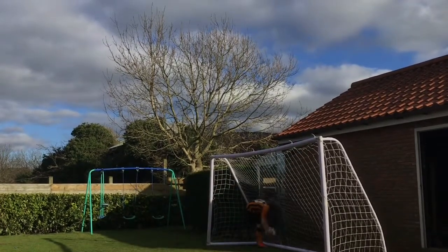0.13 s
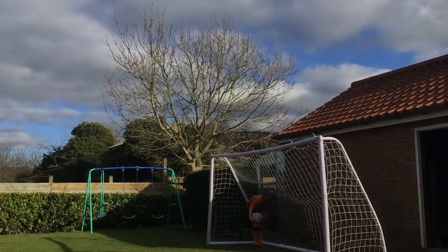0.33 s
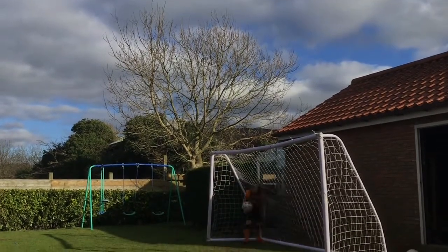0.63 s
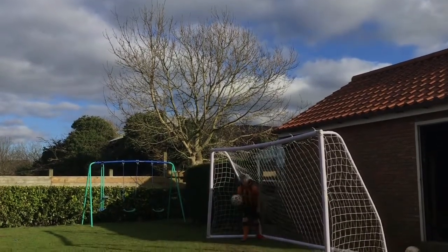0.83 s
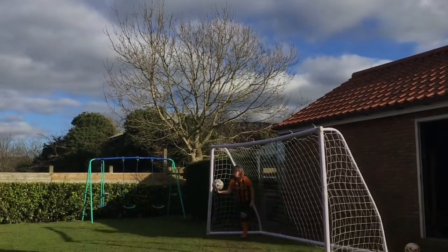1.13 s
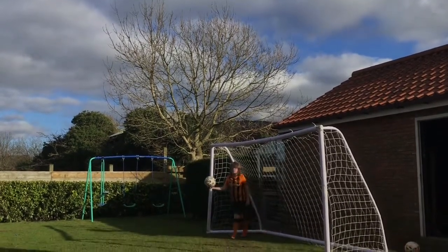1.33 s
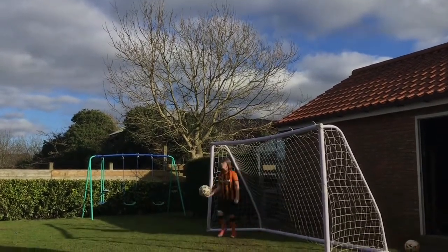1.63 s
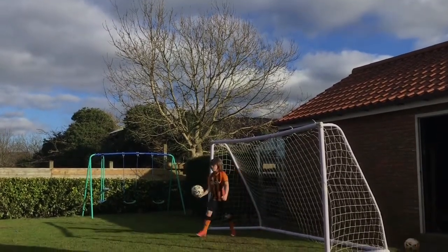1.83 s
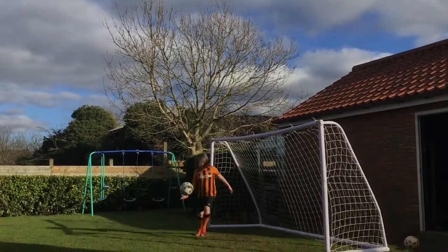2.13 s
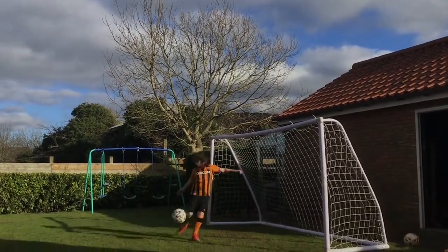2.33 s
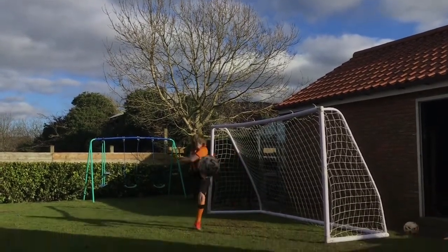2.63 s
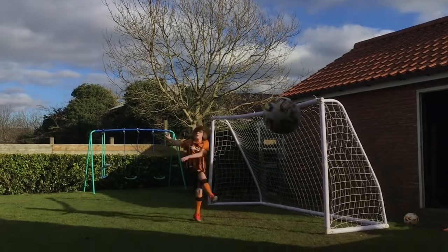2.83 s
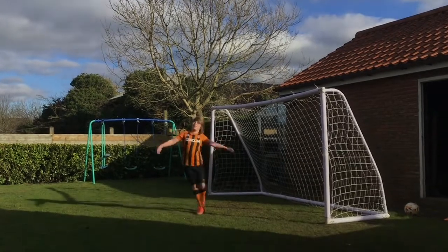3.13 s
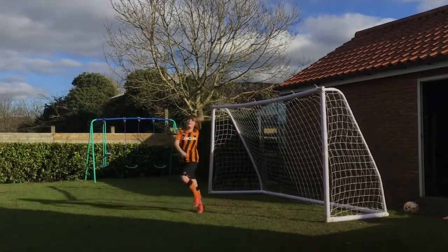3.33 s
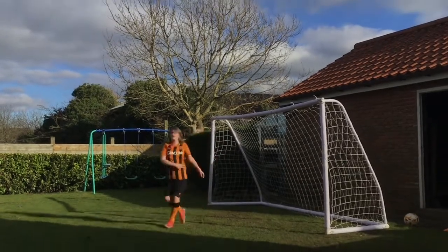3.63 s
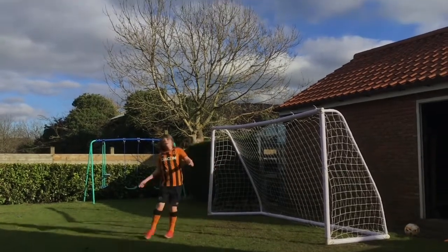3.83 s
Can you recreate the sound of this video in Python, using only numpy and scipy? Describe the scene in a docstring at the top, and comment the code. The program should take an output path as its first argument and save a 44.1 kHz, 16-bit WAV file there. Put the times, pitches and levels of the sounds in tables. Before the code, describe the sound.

In a quiet garden, a football is softly handled, then kicked with a thump. It bangs hard against wood close to the microphone, then lands and bounces more softly, over a faint rumble and barely audible birds.

```python
"""Hands and clothes scuff on a football, then a volley thuds and flutters between garden walls.
The ball slams into wooden boards close by, drops on the grass and bounces again.
The squashed ball gives the thud, its casing the slap, the air inside a hollow ping.
Boots scuff, small birds whistle far off and distant traffic rumbles."""
import sys
import numpy as np
from scipy import signal
from scipy.fft import rfft, irfft
from scipy.io import wavfile
from scipy.ndimage import uniform_filter1d

SR = 44100
rng = np.random.default_rng(int(sys.argv[2]) if len(sys.argv) > 2 else 0)


def put_to_file(sound):
    """Save the sound as 16-bit audio at rate SR, in the file named by the first command-line argument."""
    columns = np.atleast_2d(sound).T  # one column per channel
    safe = np.clip(columns, -1, 1)
    whole_steps = np.round(safe * 32767)
    wavfile.write(sys.argv[1], SR, whole_steps.astype(np.int16))


N = 176400
T = np.arange(N) / SR
BIN_HZ = np.arange(N // 2 + 1) * SR / N

# ball thuds: start_s, level_db, pitch_hz, rise_s, hold_s, t60_s, boom_db, flutter_send_db
BALL_THUDS = [(2.399, -16.5, 123, 0.0046, 0.0071, 0.15, -33, -10),
              (3.1403, -3.5, 128.8, .005, 0.0064, 0.05, -22.5, -32),
              (3.295, -34.5, 89, 0.005, 0.033, 0.23, -59, -34),
              (3.3595, -9, 99.7, 0.0086, 0.005, 0.039, -24.5, -39),
              (3.383, -12, 80, 0.0051, .014, .13, -27, -27.5),
              (3.447, -28.5, 118, 0.0054, 0.02, 0.091, -40, -12.5),
              (3.886, -32, 115.6, 0.0069, 0.037, 0.75, -48, -18)]
# woody knocks within the blows: start_s, level_db, pitch_hz, t60_s
WOOD_KNOCKS = [(3.1415, -10, 244.4, .1), (3.283, -36, 345, .16), (3.3565, -15.5, 264.6, 0.066)]
BAND_HZ = (100, 300, 900, 3000, 12000)
# casing slaps, surface crunch: start_s, rise_s, t60_s, band_db at each BAND_HZ, tail_gain_db
CASING_SLAPS = [(2.3985, 0.00055, 0.13, -36.5, -35.5, -36, -45, -49, -18),
                (2.422, 0.0018, 0.049, -50.5, -35, -54, -52, -50.5, -26.5),
                (3.1403, 0.00093, 0.09, -21.5, -16.5, -23.5, -32.5, -43.5, -34),
                (3.1467, 0.00087, .055, -34, -30, -46, -21.5, -38.5, -34),
                (3.153, 0.0009, 0.021, -27, -21, -41.5, -30.5, -44, -28),
                (3.283, 0.0088, 0.067, -42.5, -41, -62, -67, -71, -24.5),
                (3.3525, 0.0023, 0.088, -51, -25, -43.5, -49.5, -48.5, -25),
                (3.358, 0.0076, 0.11, -27.5, -25.5, -41.5, -41, -43.5, -23.5),
                (3.4425, 0.0097, 0.11, -38, -48.5, -48, -48.5, -51, -23),
                (3.885, 0.0025, 0.23, -42.5, -43, -52.5, -56, -57.5, -12),
                (3.9068, 0.00093, 0.11, -48, -38.5, -46, -44, -45, -17.5),
                (3.9355, .001, .11, -46, -37, -47.5, -46.5, -54, -13)]
# slap colour: freq_hz, gain_db
SLAP_EQ = [(50, -1.5), (150, 5), (300, -1), (540, 0.5), (750, 3), (1150, -3), (1700, -2), (2700, 1.5),
           (3900, -5), (5600, -0.5), (7300, -3.5), (9000, -0.5), (11000, -6.5), (15000, -1)]
# sharp first contacts: start_s, level_db
CASING_CRACKS = [(2.399, -23.5), (2.415, -25), (3.1397, -17.5), (3.1536, -19.5), (3.907, -23.5),
                 (3.9363, -27)]
# air modes inside the ball: pitch_hz, gain_db, width_hz
CAVITY_MODES = [(1056, -1, 26), (1214, 2, 15), (1307, 3.5, 16), (1622, 0, 25), (1839, 1, 35),
                (2091, -0.5, 25), (2368, 3, 45), (2706, 4, 43), (3284, 5, 66), (4457, 2.5, 90),
                (5730, 1, 80)]
# blows that ring those modes clearly: start_s, level_db
CAVITY_PINGS = [(2.40, -61), (3.147, -35.5), (3.359, -45.5), (3.448, -52), (3.908, -50.5), (3.937, -49.5)]
# modes of boards and ball: pitch_hz, gain_db, t60_s
BOARD_MODES = [(244, 9, 0.15), (286.7, -2.5, .45), (344, -11, 0.99), (461, -2, 0.25), (519, -9, 0.13),
               (605, -10, .24), (734, -2, 0.18), (853, -7, 0.15), (1242, -3.5, 0.19), (1614, -15.5, 0.32),
               (2050, -15.5, .16), (2312, -0.5, 0.12), (2525, -7.5, .15), (2640, -1.5, 0.1)]
# hands, clothes, steps: start_s, rise_s, t60_s, band_db at each BAND_HZ, tail_gain_db
PLAYER_SCUFFS = [(0.0, 0.034, 0.4, -78, -55.5, -85, -88, -63, -15),
                 (.63, .04, 0.5, -74, -86, -73.5, -88, -87, -12),
                 (.782, 0.046, 0.23, -86, -64, -57.5, -75, -60.5, -8),
                 (1.199, 0.024, 0.38, -82, -56, -61.5, -79.5, -60, -13),
                 (1.40, 0.0077, 0.26, -82, -69, -76.5, -77.5, -81, -20),
                 (1.67, .06, 0.35, -85, -62, -70.5, -78.5, -82, -15),
                 (2.265, 0.023, 0.22, -68, -76, -77.5, -81, -75.5, -13),
                 (2.961, .016, 0.37, -77, -63.5, -67.5, -67.5, -71.5, -11),
                 (3.06, 0.091, 0.37, -65, -64, -68.5, -73, -81, 6.5),
                 (3.735, 0.037, 0.52, -76, -82, -64.5, -78, -104, -11)]
# scuff colour: freq_hz, gain_db
SCUFF_EQ = [(100, -2), (250, -4.5), (450, 1.5), (620, 2), (950, -4.5), (1500, 1.5), (2500, 0), (4500, 2),
            (7200, -6.5), (8800, 1), (10500, -4), (15000, 1.5)]
# returns from fence and house: delay_s, gain_db
WALL_ECHOES = [(.052, -26), (.064, -24.5), (.086, -24.5)]
# distant birds: start_s, length_s, start_hz, end_hz, level_db
BIRD_CALLS = [(1.07, 0.11, 3360, 3350, -77.5), (2.27, 0.13, 7940, 7300, -79),
              (2.51, 0.0535, 7600, 7050, -79), (2.66, 0.071, 7300, 6500, -83)]
# traffic and hiss spectrum: freq_hz, gain_db
TRAFFIC_EQ = [(20, -44), (40, -21.5), (62, -13.5), (85, -4.5), (115, 1.5), (150, -3.5), (200, -15.5),
              (270, -14.5), (380, -21.5), (550, -31.5), (950, -39), (1800, -42.5), (3600, -43.5),
              (7000, -51), (9000, -49), (15500, -53)]


def from_db(db):
    """Decibels to gain."""
    return 10 ** (np.asarray(db) / 20)


def eq_db(points, hz):
    """Interpolate a spectrum over log frequency."""
    knots_hz, db = np.transpose(points)
    return np.interp(np.log(hz), np.log(knots_hz), db)


def unit_rms(x):
    """Scale to unit rms."""
    return x / np.sqrt(np.mean(x ** 2) + 1e-20)


def butter(x, order, cut_hz, kind="low"):
    """Causal Butterworth filter."""
    return signal.sosfilt(signal.butter(order, cut_hz, kind, fs=SR, output="sos"), x)


def envelope(age_s, rise_s, t60_s, hold_s=0):
    """Linear attack, hold, exponential release."""
    attack = np.clip(age_s / rise_s, 0, 1)
    return attack * from_db(-60 * np.clip((age_s - rise_s - hold_s) / t60_s, 0, 3))


def noise_bands():
    """Third-octave centres and their levelled noises, about unit power per octave."""
    edges_hz = 50 * 2 ** (np.arange(26) / 3)
    white = rfft(rng.standard_normal(N))
    noises = []
    for low_hz, high_hz in zip(edges_hz, edges_hz[1:]):
        band = unit_rms(irfft(white * ((BIN_HZ >= low_hz) & (BIN_HZ < high_hz)), N))
        power = uniform_filter1d(band ** 2, size=700)
        noises.append(band / np.sqrt(3 * (power + .05)))
    return np.sqrt(edges_hz[:-1] * edges_hz[1:]), np.array(noises)


def bursts(rows, eq, bands, grain_db, grain_hz=500):
    """Grainy contact noise with a smooth garden tail, shorter in the treble."""
    knots_s = np.arange(0, 4.01, 1 / grain_hz)
    grain = from_db(grain_db * np.interp(T, knots_s, rng.standard_normal(N)[:len(knots_s)]))
    centres_hz, noises = bands
    treble = centres_hz > 2000
    out = np.zeros(N)
    for start_s, rise_s, t60_s, *band_db, tail_gain_db in rows:
        part = slice(int(start_s * SR), int(start_s * SR) + SR)
        age_s = T[part] - start_s
        gains = from_db(eq_db(list(zip(BAND_HZ, band_db)), centres_hz) + eq_db(eq, centres_hz))
        direct = envelope(age_s, rise_s, t60_s) * grain[part]
        for mask, tail_t60_s in ((~treble, .62), (treble, .51)):
            noise = (gains * mask) @ noises[:, part]
            tail = from_db(tail_gain_db) * envelope(age_s, rise_s + .022, tail_t60_s)
            out[part] += noise * np.hypot(direct, tail)
    return out


def thuds(squash=2.11, settle_s=.0027, boom_hz=57.9, boom_peak_s=.028):
    """The squashed ball pushes out a few sinking low cycles over a slower boom; the walls flutter."""
    out, send = np.zeros(N), np.zeros(N)
    for start_s, level_db, pitch_hz, rise_s, hold_s, t60_s, boom_db, send_db in BALL_THUDS:
        age_s = np.maximum(T - start_s, 0)
        # glides down from (1 + squash) * pitch_hz
        cycles = pitch_hz * (age_s + squash * settle_s * (1 - np.exp(-age_s / settle_s)))
        thud = -from_db(level_db) * envelope(age_s, rise_s, t60_s, hold_s) * np.sin(2 * np.pi * cycles)
        swell = (age_s / boom_peak_s * np.exp(1 - age_s / boom_peak_s)) ** 4
        out += thud + from_db(boom_db) * swell * np.sin(2 * np.pi * boom_hz * age_s)
        send += from_db(send_db) * thud
    return out + flutter(send)


def knocks(rise_s=.003):
    """One quickly damped mode per knock."""
    out = np.zeros(N)
    for start_s, level_db, pitch_hz, t60_s in WOOD_KNOCKS:
        age_s = T - start_s
        out += from_db(level_db) * envelope(age_s, rise_s, t60_s) * np.sin(2 * np.pi * pitch_hz * age_s)
    return out


def slaps(bands):
    """The casing slaps; the struck surface crunches."""
    return bursts(CASING_SLAPS, SLAP_EQ, bands, grain_db=1)


def cracks(decay_s=.00078):
    """The taut casing snaps on first contact."""
    strength = sum(from_db(level_db) * (T >= start_s) * np.exp(-np.clip((T - start_s) / decay_s, 0, 50))
                   for start_s, level_db in CASING_CRACKS)
    return butter(.5 * strength * rng.standard_normal(N), 1, cut_hz=1500, kind="high")


def cavity(casing):
    """The air in the ball resonates to the casing noise."""
    out = np.zeros(N)
    for pitch_hz, gain_db, width_hz in CAVITY_MODES:
        radius = np.exp(-np.pi * width_hz / SR)
        b = (1 - radius ** 2) / 2 * np.array([1, 0, -1])
        a = [1, -2 * radius * np.cos(2 * np.pi * pitch_hz / SR), radius ** 2]
        out += from_db(gain_db) * signal.lfilter(b, a, casing + 1e-18)
    return out


def pings(tilt_db_per_octave=-4, spread_db=1.8):
    """The air in the ball rings freely, with random strength per mode and blow."""
    out = np.zeros(N)
    for start_s, level_db in CAVITY_PINGS:
        part = slice(int(start_s * SR), int(start_s * SR) + SR // 2)
        age_s = T[part] - start_s
        for pitch_hz, gain_db, width_hz in CAVITY_MODES:
            tilt_db = tilt_db_per_octave * np.log2(pitch_hz / CAVITY_MODES[0][0])
            gain = from_db(level_db + gain_db + tilt_db + rng.normal(0, spread_db))
            tone = np.sin(2 * np.pi * (pitch_hz * age_s + rng.random()))
            out[part] += gain * np.exp(-np.pi * width_hz * age_s) * tone
    return out


def boards(start_s=3.141, level_db=-32.5, rise_s=.002):
    """Boards and ball ring after the hardest blow."""
    age_s = np.maximum(T - start_s, 0)
    out = np.zeros(N)
    for pitch_hz, gain_db, t60_s in BOARD_MODES:
        tone = np.sin(2 * np.pi * (pitch_hz * age_s + rng.random()))
        out += from_db(level_db + gain_db) * envelope(age_s, rise_s, t60_s) * tone
    return out


def flutter(x, first_s=.056, period_s=.0425, loss_db=3):
    """Bass bounces to and fro between the walls."""
    bass = butter(x, 2, cut_hz=172)
    return sum(from_db(-loss_db * k) * np.interp(T - first_s - k * period_s, T, bass, left=0)
               for k in range(6))


def echoes(x):
    """Dull returns from fence and house."""
    dull = butter(x, 1, cut_hz=2900)
    return sum(from_db(gain_db) * np.interp(T - delay_s, T, dull, left=0)
               for delay_s, gain_db in WALL_ECHOES)


def scuffs(bands):
    """Hands rub the ball; clothes and boots scuff."""
    return bursts(PLAYER_SCUFFS, SCUFF_EQ, bands, grain_db=2.1)


def birds(waver_rms_hz=55):
    """Thin wavering whistles that droop at the end."""
    waver_hz = waver_rms_hz * unit_rms(uniform_filter1d(rng.standard_normal(N), size=300))
    out = np.zeros(N)
    for start_s, length_s, start_hz, end_hz, level_db in BIRD_CALLS:
        progress = np.clip((T - start_s) / length_s, 0, 1)
        pitch_hz = start_hz + (end_hz - start_hz) * progress ** 2 + waver_hz
        swell = np.sqrt(np.abs(np.sin(np.pi * progress)))
        out += from_db(level_db) * swell * np.sin(2 * np.pi * np.cumsum(pitch_hz) / SR)
    return out


def traffic(level_db=-56.5):
    """Steady far rumble with a faint hiss."""
    gains = from_db(eq_db(TRAFFIC_EQ, np.maximum(BIN_HZ, 1)))
    return from_db(level_db) * unit_rms(irfft(rfft(rng.standard_normal(N)) * gains, N))


def scene():
    """Ball, player and garden in mono."""
    bands = noise_bands()
    casing = slaps(bands) + cracks()
    ball = thuds() + knocks() + pings() + from_db(-2) * casing + from_db(-6.5) * cavity(casing)
    return (ball + boards() + echoes(ball) + scuffs(bands) + birds() + traffic())[None]


def record(dry):
    """The microphone drops the deepest bass; a steep low-pass cuts the top."""
    thin = butter(dry, 3, cut_hz=44.4, kind="high")
    top_hz = 15900
    return signal.sosfilt(signal.ellip(12, .1, 80, top_hz, fs=SR, output="sos"), thin)


dry = scene()
out = record(dry)
put_to_file(out)
```